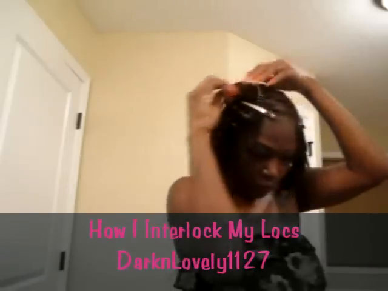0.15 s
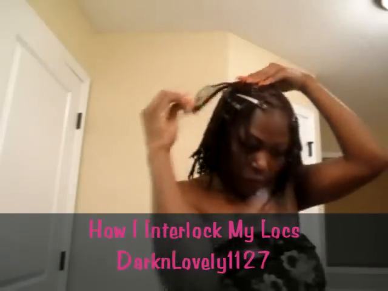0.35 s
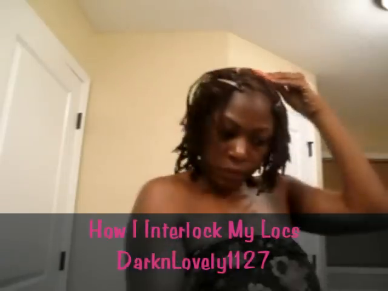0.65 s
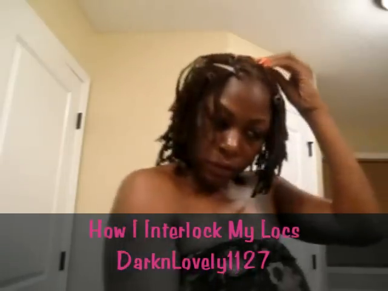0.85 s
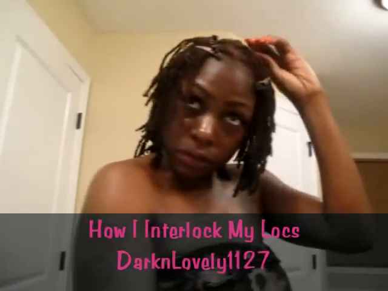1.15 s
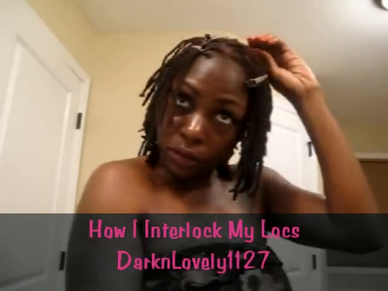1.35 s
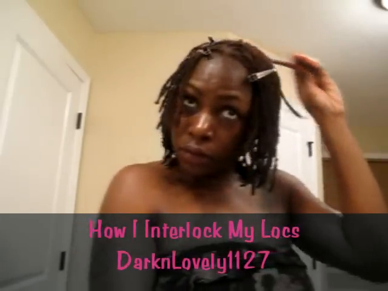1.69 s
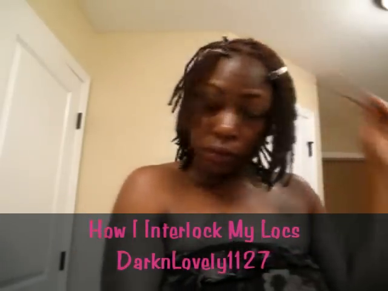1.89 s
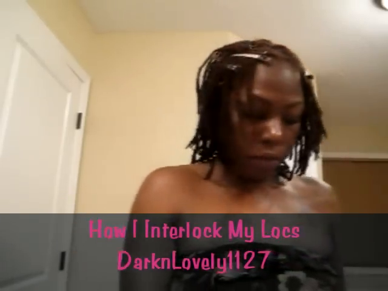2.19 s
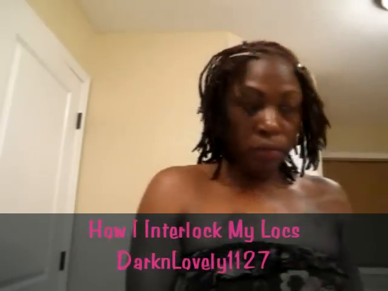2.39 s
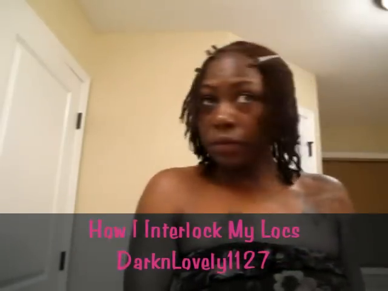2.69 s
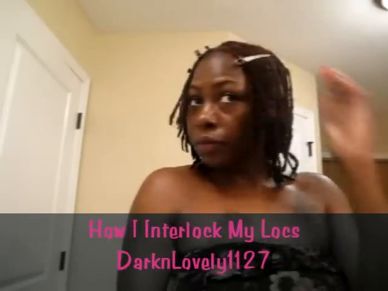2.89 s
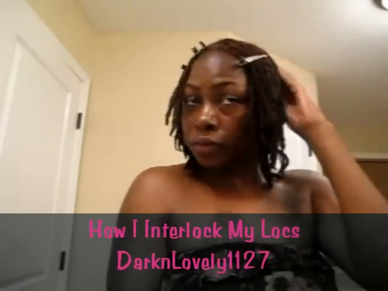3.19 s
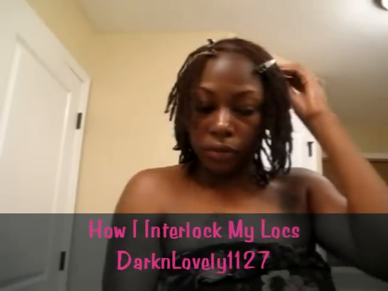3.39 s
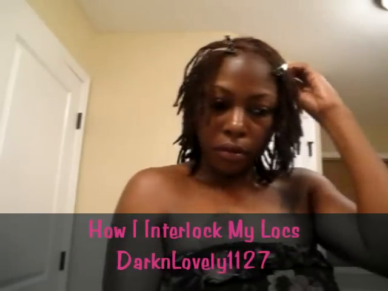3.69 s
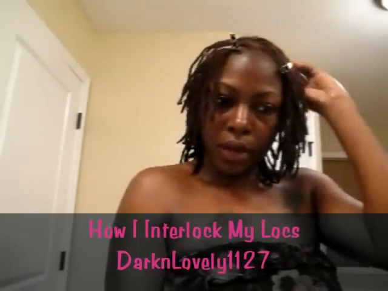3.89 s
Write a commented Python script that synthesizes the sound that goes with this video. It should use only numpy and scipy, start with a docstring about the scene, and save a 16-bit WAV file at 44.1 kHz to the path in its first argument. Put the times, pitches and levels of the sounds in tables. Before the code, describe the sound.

Close, sparse handling of metal hair clips: soft hair strokes and dull skin rubs, small clicks, a hard clack on the counter, a crisp double snap, a second clack preceded by a brief slide, then light ticking and a final sharp metallic burst. The hard-walled room adds a quick bright echo. Steady low fan rumble and mild hiss sit underneath; the small built-in stereo microphone sounds slightly coloured.

```python
"""A small, hard-walled bathroom: metal hair clips are unclipped from hair and set down on a counter.
Clip jaws click and ring: brief noisy touches drive damped steel modes. The counter knocks with a broad
clack, woody modes and a low thump. Hair rustle and scrapes are random slips over hiss; soft rubs are
dull noise. Walls answer with early noise and a diffuse tail, over ventilation rumble and a thin whine."""
import sys
import numpy as np
from scipy import signal
from scipy.fft import rfft, irfft, next_fast_len
from scipy.io import wavfile

SR = 44100
rng = np.random.default_rng(int(sys.argv[2]) if len(sys.argv) > 2 else 0)


def transcribe(u):
    """Save the signal u as a 16-bit wav file named by the first command-line argument.

    u: samples, shape (n,) or (channels, n), limited to [-1, 1]; the rate is SR.
    q: integer samples, one column per channel.
    """
    v = np.clip(np.atleast_2d(u).T, -1, 1)
    q = np.round(v * 32767).astype(np.int16)
    wavfile.write(sys.argv[1], SR, q)


N = 178605
TIME = np.arange(N) / SR
BLOW_SAMPLES = 8192

# Spectrum of the jaws' snap. Each row: frequency in Hz, level in dB per Hz.
SNAP_SPECTRUM = [(40, -39), (200, -12), (500, -22), (1400, -4.5), (2300, 5), (3500, 5.5), (6000, 6.5),
                 (8200, -1), (9500, -7.5), (12500, -24.5), (14500, -8)]
# Steel resonances, by clip name. Each row: frequency in Hz, width in Hz, level in dB.
CLIP_MODES = { "first": [(2230, 230, -9.5), (2630, 210, -9.5), (4420, 160, -1.5), (4620, 160, -3),
              (4970, 160, 0.5), (7980, 300, -2.5), (10840, 200, -19), (12700, 300, -11)],
              "second": [(2220, 200, -8.5), (2660, 180, 0), (3950, 470, 2), (4410, 170, 2.5),
              (4740, 230, 1.5), (5970, 360, -2), (8470, 180, -5.5), (9200, 220, -8.5), (10600, 210, -9),
              (12500, 370, -6)], "third": [(708, 68, -21.5), (994, 27, -16.5), (1915, 200, -9.5),
              (2410, 94, -13.5), (4760, 70, 1), (5060, 140, -2), (5810, 470, -0.5), (6850, 880, -6.5),
              (7370, 115, -5), (8230, 350, -7.5), (10040, 170, -19.5)], "fourth": [(2370, 260, -12),
              (3850, 260, -2), (5060, 230, -7.5)]}
# Touch decay at the reference level, and the level rise that doubles it: a harder snap chatters longer.
CHATTER_DECAY_S, CHATTER_AT_DB, CHATTER_DOUBLES_DB = 0.0016, -45, 31


def click(clip, tilt_db_per_octave, ring_db, force_db):
    """The jaws shut: a dry snap, plus a touch ringing that clip's steel modes."""
    decay_s = CHATTER_DECAY_S * 2 ** ((force_db - CHATTER_AT_DB) / CHATTER_DOUBLES_DB)
    steel = resonances(CLIP_MODES[clip], TIME[:BLOW_SAMPLES])
    ring = signal.fftconvolve(contact(decay_s), steel)[:BLOW_SAMPLES]
    snap = unit(colour(contact(decay_s), SNAP_SPECTRUM))
    sound = snap + from_db(ring_db) * unit(ring)
    return unit(colour(sound, [(60, -12), (280, -16)], tilt_db_per_octave))


# Jaws snapping or ticking. Each row: start in seconds, level in dB, clip name,
# brightness in dB per octave above 500 Hz, ring in dB re snap, room send in dB re direct.
CLICKS = [(0.4825, -36, "first", 1, 7, -2), (0.698, -43.5, "third", -1, 1, 0),
          (1.743, -51, "second", 5.5, -16, 0), (1.8291, -29, "second", 0, 2.5, -5.5),
          (1.852, -39.5, "first", -1.5, 23, -6), (2.367, -59, "fourth", -6, 15, 2),
          (3.116, -66.5, "first", 2, 9, 3), (3.3806, -47.5, "third", 2.5, -6, -0.5),
          (3.452, -50.5, "third", 10.5, -12, 1), (3.485, -54, "third", -4, -4, 0.5),
          (3.5030, -43.5, "third", 3.5, -8, 1.5), (3.7300, -46, "fourth", 1, 4, -2.5),
          (3.77, -43.5, "third", 1.5, -1.5, -0.5), (3.949, -36, "second", 8, -10, -9),
          (3.9516, -19, "third", 5, 16, -17.5), (3.9601, -22.5, "third", -1, 11, -6),
          (3.974, -31.5, "third", -0.5, 17, -8.5)]


def clicks():
    """Every snap as start, level, room send and waveform; its level also sets its chatter."""
    return [(s, db, room_db, click(*manner, db)) for s, db, *manner, room_db in CLICKS]


# Spectrum of the counter's clack. Each row: frequency in Hz, level in dB per Hz.
CLACK_SPECTRUM = [(40, -21), (120, -27), (240, -9), (520, -2), (750, -2), (1100, 0), (1850, 0.5),
                  (2600, 1.5), (4200, -1.5), (6000, -5.5), (8000, -8), (10000, -23), (12000, -23.5),
                  (14500, -47)]
# Resonances of the counter top. Each row: frequency in Hz, width in Hz, level in dB.
COUNTER_MODES = [(347, 43, -5), (494, 82, 1.5), (618, 46, -7), (830, 26, -7), (993, 120, 0), (1217, 81, 2),
                 (1780, 480, -1.5), (3660, 87, 2.5), (4820, 120, -2.5)]
# The cabinet under the counter. Each row: frequency in Hz, width in Hz, level in dB.
CABINET_MODES = [(245, 72, 0)]
RING_T60_S = 0.083


def knock(tilt_db_per_octave, thump_db, ring_hz, ring_db, body_db=-6.5):
    t = TIME[:BLOW_SAMPLES]
    clack = unit(colour(contact(decay_s=0.0017), CLACK_SPECTRUM))
    body = from_db(body_db) * resonances(COUNTER_MODES, t)
    # a panel radiates little deep bass
    thump = from_db(thump_db) * colour(resonances(CABINET_MODES, t), [(90, -15.5), (210, -0.5)])
    ring = unit(np.sin(2 * np.pi * ring_hz * t) * from_db(-60 * t / RING_T60_S))
    return unit(colour(clack + body, [(1, 0)], tilt_db_per_octave)) + thump + from_db(ring_db) * ring


# Clips and fingers meeting the counter. Each row: start in seconds, level of clack and body in dB,
# brightness in dB per octave above 500 Hz, thump in dB, ring in Hz, ring in dB, room send in dB;
# thump and ring are re clack and body, room send is re direct.
KNOCKS = [(1.0068, -37.5, 1.5, -16.5, 8100, -22, 3), (1.098, -47.5, 0.5, -18, 8020, -33, 6),
          (1.2258, -16, 0.74, -26.5, 8010, -12.5, -0.5), (1.288, -31.5, -1.5, -9.5, 8020, -33, 4.5),
          (2.5056, -45.5, -2, -9, 8020, -26, 4), (2.618, -19, -0.86, -15.5, 12000, -28, 1.04),
          (2.669, -30, -1.5, -17, 7800, -34, 2.5), (3.6668, -45.5, 0, -36, 7740, -34, 0.5),
          (4.026, -44.5, 1, -32, 8020, -22, -2)]


def knocks():
    """Every counter touch as start, level, room send and waveform."""
    return [(s, db, room_db, knock(*manner)) for s, db, *manner, room_db in KNOCKS]


def contact(decay_s):
    """The force of one touch: a brief chatter with a nearly even spectrum."""
    force = rfft(rng.standard_normal(BLOW_SAMPLES) * np.exp(-TIME[:BLOW_SAMPLES] / decay_s))
    even = irfft(force / np.abs(force))
    return unit(even * np.exp(-TIME[:BLOW_SAMPLES] / (8 * decay_s)))


def resonances(modes, t):
    """Damped sines of a struck body, each about a decibel stronger or weaker from blow to blow."""
    total = np.zeros(len(t))
    for k, (hz, width_hz, db) in enumerate(modes):
        mode = unit(np.exp(-np.pi * width_hz * t) * np.sin(2 * np.pi * hz * t))
        total += from_db(db + rng.standard_normal()) * (-1) ** k * mode
    return unit(total)


# Spectrum of rustling hair. Each row: frequency in Hz, level in dB per Hz.
RUSTLE_SPECTRUM = [(150, -9), (500, -5), (1500, -3.5), (3000, 1.5), (5000, 3.5), (7000, 2), (10000, -13),
                   (14000, -23)]
# Fingers stroking hair. Each row: start in seconds, length before the fade in seconds,
# level in dB before the direct and room sends, brightness in dB per octave above 500 Hz.
HAIR_STROKES = [(0, 0.15, -62.5, 2), (0.238, 0.088, -68.5, -1), (0.449, .19, -62, -1),
                (0.643, 0.054, -49.5, 0), (0.917, 0.034, -50.5, 3.5), (0.962, 0.054, -56.5, 5),
                (1.587, .07, -57.5, 2.5), (1.669, 0.029, -50.5, 2), (1.999, 0.17, -66, 2.5),
                (2.393, 0.16, -66.5, -4), (3.576, 0.052, -53.5, -1)]
STROKE_ATTACK_S, STROKE_FADE_DB_PER_S = 0.0078, 450


def hair():
    """Strands slip past the fingers: each stroke swells, holds and fades."""
    track, t = np.zeros(N), TIME[:SR // 2]
    for s, length_s, db, tilt in HAIR_STROKES:
        fade_db = STROKE_FADE_DB_PER_S * np.maximum(t - length_s, 0)
        level = np.minimum(t / STROKE_ATTACK_S, 1) * from_db(db - fade_db)
        rustle = friction(RUSTLE_SPECTRUM, 900, grain_db=7.0, smooth_db=9, tilt_db_per_octave=tilt, size=len(t))
        add(track, s, level * rustle)
    return track


# Spectrum of a sliding clip. Each row: frequency in Hz, level in dB per Hz.
SLIDE_SPECTRUM = [(60, -39), (150, -7), (300, -5), (550, 2), (850, -6.5), (1050, 2.5), (1500, -14.5),
                  (2700, -0.5), (4000, -7.5), (7000, -10), (10000, -28), (14000, -33)]
# A clip sliding on the counter. Each row: start in seconds, length in seconds,
# full level in dB before the direct and room sends.
SCRAPES = [(1.102, 0.038, -50.5), (2.509, 0.099, -40)]


def scrapes():
    """A clip slides on the counter in slips and hiss with abrupt edges."""
    return strokes(SCRAPES, edge_s=0.0016) * friction(SLIDE_SPECTRUM, 380, grain_db=9.0, smooth_db=12)


# Spectrum of a soft rub. Each row: frequency in Hz, level in dB per Hz.
RUB_SPECTRUM = [(150, -11), (300, -2.5), (420, -6.5), (510, 4), (650, -14), (1100, -13.5), (2500, -15.5),
                (8000, -46)]
# Hand and arm rubs. Each row: start in seconds, length in seconds,
# full level in dB before the direct and room sends; rubs under two edges long stay below it.
RUBS = [(-0.05, 0.18, -65), (0.405, 0.084, -53.5), (0.755, 0.042, -52), (1.67, 0.054, -56),
        (2.155, 0.046, -62), (2.41, 0.088, -63.5), (3.665, 0.074, -63.5)]


def rubs():
    """Hand and arm rub softly: dull noise with gradual edges."""
    skin = np.sqrt(N) * unit(colour(rng.standard_normal(N), RUB_SPECTRUM))
    return strokes(RUBS, edge_s=0.03) * skin


def strokes(rows, edge_s):
    """Level of strokes with straight rises and falls."""
    level = np.zeros(N)
    for s, length_s, db in rows:
        to_nearest_end_s = np.minimum(TIME - s, s + length_s - TIME)
        level += from_db(db) * np.clip(to_nearest_end_s / edge_s, 0, 1)
    return level


def friction(spectrum, slips_per_s, grain_db, smooth_db, tilt_db_per_octave=0, size=N):
    """Tiny slips of uneven size over a smooth hiss; rms 1."""
    happens = rng.random(size) < slips_per_s / SR
    slip_size = from_db(grain_db * np.minimum(rng.exponential(1, size), 4))
    slips = happens * rng.choice([-1, 1], size) * slip_size
    rough = unit(slips) + from_db(smooth_db) * unit(rng.standard_normal(size))
    return np.sqrt(size) * unit(colour(rough, spectrum, tilt_db_per_octave))


# Reverberation time. Each row: frequency in Hz, t60 in seconds.
ROOM_T60 = [(150, 0.29), (400, 0.54), (1000, 0.74), (2800, 0.74), (7000, 0.64), (12000, 0.45)]


def bathroom(x, early_db=-3.0, early_s=0.0094, first_wall_s=0.0033):
    """Close walls answer in a quick burst under a diffuse tail; its middle range lasts longest."""
    t = TIME[:SR]
    hz, frame_s, cells = signal.stft(diffuse(SR), SR, nperseg=256)
    fading = from_db(-60 * frame_s / at_hz(ROOM_T60, hz)[:, None])
    arrived = t > first_wall_s
    tail = unit(signal.istft(cells * fading, SR)[1][:, :SR] * arrived)
    early = unit(diffuse(SR) * np.exp(-t / early_s) * arrived)
    return signal.fftconvolve(x[None], tail + from_db(early_db) * early, axes=1)[:, :N]


# Left-right likeness of diffuse sound. Each row: frequency in Hz, correlation from 0 to 1.
LIKENESS = [(50, .87), (130, .95), (290, .99), (640, .96), (1400, .82), (3100, .35), (6000, 0)]


def diffuse(size):
    """Stereo noise from all around: alike in the bass, unrelated in the treble."""
    mid, side = rfft(rng.standard_normal((2, size)))
    alike = np.clip(at_hz(LIKENESS, np.fft.rfftfreq(size, 1 / SR)), -1, 1)
    shared, opposed = np.sqrt((1 + alike) / 2) * mid, np.sqrt((1 - alike) / 2) * side
    return irfft(shared + opposed * [[1], [-1]], size)


# Ventilation rumble. Each row: frequency in Hz, level in dB per Hz.
AIR_SPECTRUM = [(20, -10), (55, 0.5), (85, -1.5), (115, -3.5), (160, 0), (220, 3), (300, -4), (500, -7.5),
                (1000, -13), (2500, -14.5), (5000, -24), (14000, -34)]
AIR_DB = -63.5
# Steady tones of fan and electronics. Each row: frequency in Hz, rms level in dB.
HUM_TONES = [(58, -82), (119, -71.5), (238, -73.5), (8213, -81.5)]


def background():
    """Ventilation rumble as diffuse noise, with a few steady sine tones."""
    sound = from_db(AIR_DB) * np.sqrt(N) * unit(colour(diffuse(N), AIR_SPECTRUM))
    for hz, db in HUM_TONES:
        sound = sound + np.sqrt(2) * from_db(db) * np.sin(2 * np.pi * (hz * TIME + rng.random()))
    return sound


def from_db(db):
    """Decibels to amplitude."""
    return 10 ** (np.asarray(db) / 20)


def unit(x):
    """Scale to energy 1, averaged over the channels."""
    return x / np.sqrt(np.mean(np.sum(x ** 2, axis=-1)) + 1e-20)


def at_hz(points, hz):
    """Read a table on a log-frequency axis."""
    f, value = np.transpose(points)
    return np.interp(np.log(np.maximum(hz, 1)), np.log(f), value)


def colour(x, spectrum, tilt_db_per_octave=0):
    """Causal (minimum-phase) filter with the given spectrum, tilted above 500 Hz."""
    size = next_fast_len(x.shape[-1] + BLOW_SAMPLES)
    hz = np.abs(np.fft.fftfreq(size, 1 / SR))
    octaves = np.log2(np.maximum(hz, 500) / 500)
    gain = from_db(at_hz(spectrum, hz) + tilt_db_per_octave * octaves)
    # folding the cepstrum onto positive time gives minimum phase
    cepstrum = np.fft.ifft(np.log(gain)).real
    cepstrum[1:size // 2] *= 2
    cepstrum[size // 2:] = 0
    return irfft(rfft(x, size) * np.exp(rfft(cepstrum)), size)[..., :x.shape[-1]]


def add(track, s, sound):
    """Mix a sound into a track at time s."""
    start = max(round(s * SR), 0)
    track[start:start + len(sound)] += sound[:N - start]


def scene(rub_direct_db=0.5, rub_room_db=-3.5):
    """Each sound reaches the microphones directly and by way of the walls."""
    handling = hair() + rubs() + scrapes()
    direct, to_walls = from_db(rub_direct_db) * handling, from_db(rub_room_db) * handling
    for s, db, room_db, sound in clicks() + knocks():
        strength = from_db(db) * np.sqrt(0.005 * SR)   # unit energy spread over 5 ms has this rms
        add(direct, s, strength * sound)
        add(to_walls, s, strength * from_db(room_db) * sound)
    later = np.pad(direct, (1, 0))[:N]   # the left port is one sample farther away
    return np.stack([later, direct]) + bathroom(to_walls) + background()


# Colour of each microphone port. Each row: frequency in Hz, gain in dB.
LEFT_PORT = [(150, 1.5), (700, 1.5), (2500, -0.5), (3800, 2), (4750, 8), (5600, 4.5), (6800, -12),
             (9000, -8.5), (14000, -12)]
RIGHT_PORT = [(150, 1.5), (700, -1.25), (2500, -2.5), (3800, -2), (4800, -0.5), (6200, 5.5), (8000, 1.5),
              (10500, 1.5), (14000, -8.5)]
# Preamplifier hiss. Each row: frequency in Hz, level in dB per Hz.
HISS_SPECTRUM = [(40, 10.5), (350, 9), (3000, -0.5), (6000, 0), (8000, -2.5), (12000, -8), (15000, -11.5)]
HISS_DB, CUTOFF_HZ = -63, 14200


def record(dry, top=0.61):
    """Each port adds its own colour, the preamplifier hisses and rounds the highest peaks; the top is cut."""
    ports = np.stack([colour(dry[0], LEFT_PORT), colour(dry[1], RIGHT_PORT)])
    hiss = from_db(HISS_DB) * np.sqrt(N) * unit(colour(rng.standard_normal((2, N)), HISS_SPECTRUM))
    rounded = top * np.tanh((ports + hiss) / top)
    lowpass = signal.ellip(10, .2, 80, CUTOFF_HZ, fs=SR, output="sos")
    return signal.sosfilt(lowpass, rounded)


dry = scene()
out = record(dry)
transcribe(out)
```